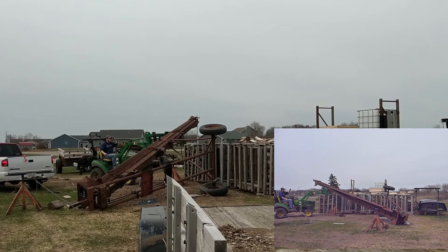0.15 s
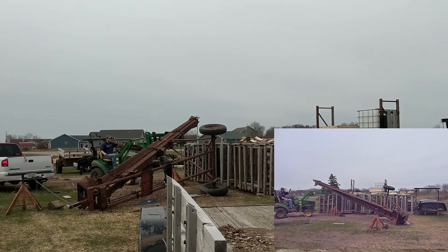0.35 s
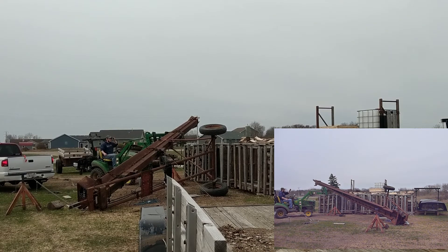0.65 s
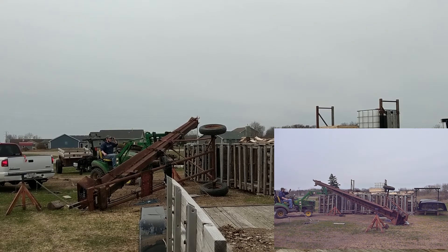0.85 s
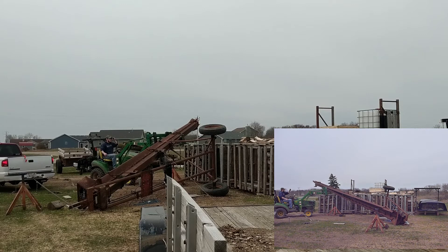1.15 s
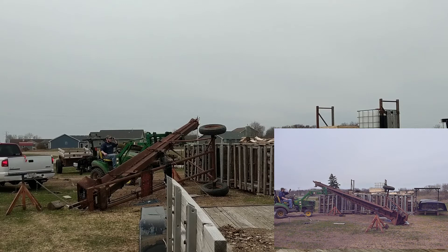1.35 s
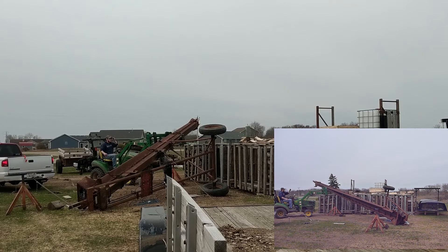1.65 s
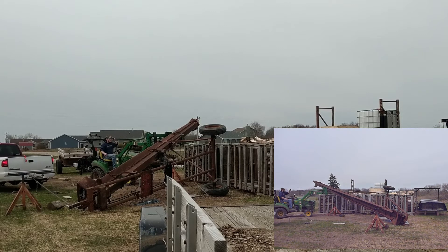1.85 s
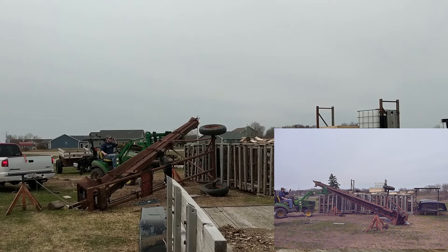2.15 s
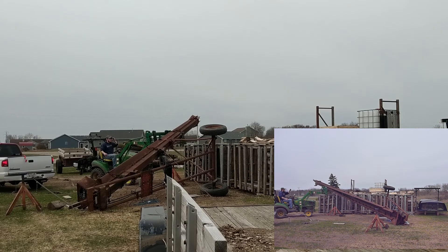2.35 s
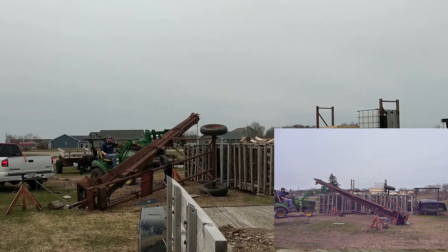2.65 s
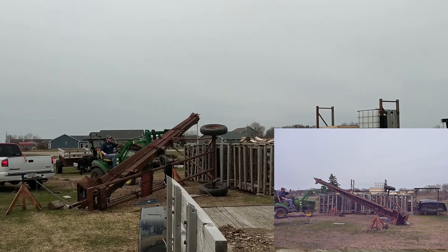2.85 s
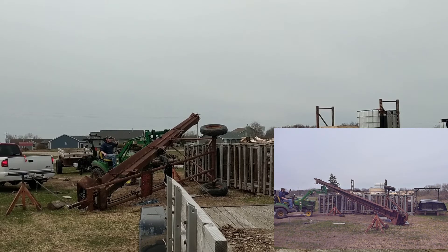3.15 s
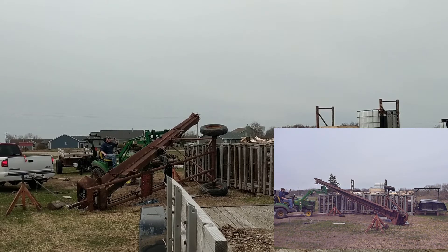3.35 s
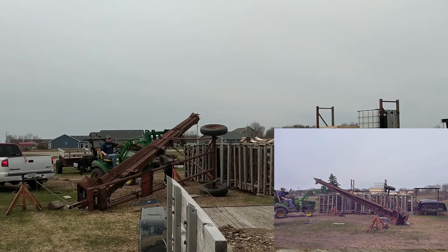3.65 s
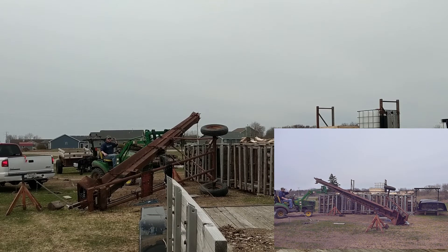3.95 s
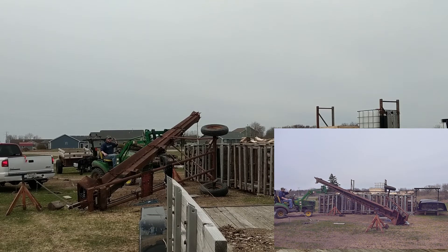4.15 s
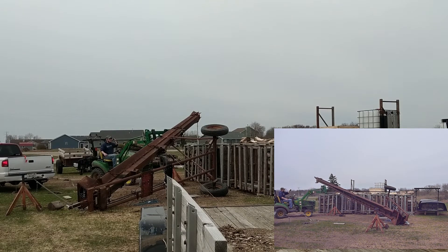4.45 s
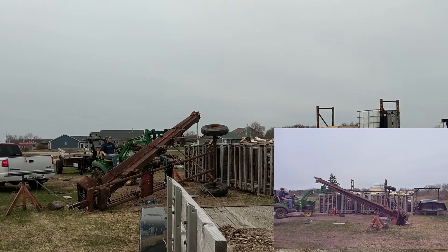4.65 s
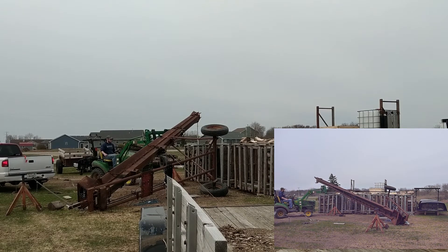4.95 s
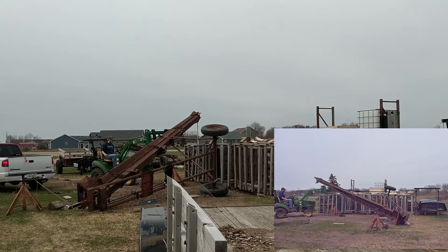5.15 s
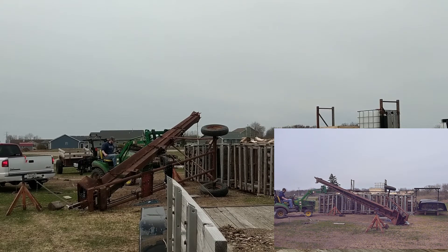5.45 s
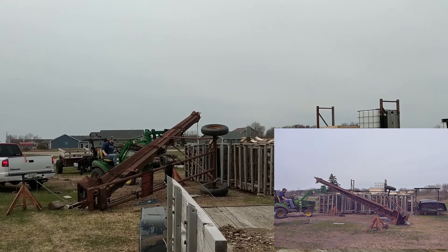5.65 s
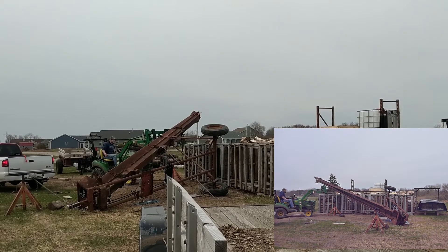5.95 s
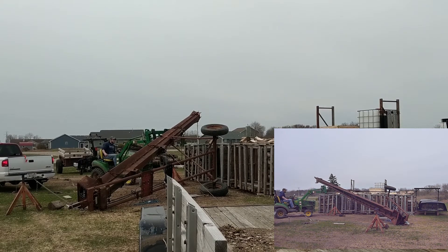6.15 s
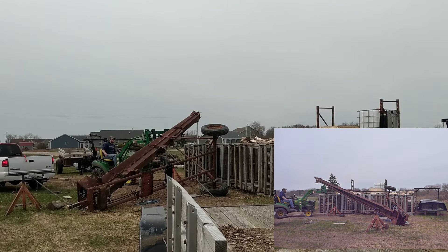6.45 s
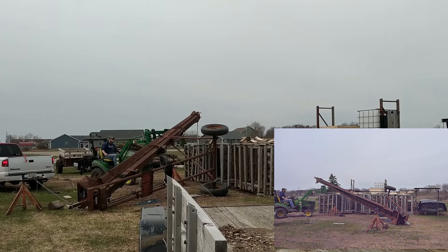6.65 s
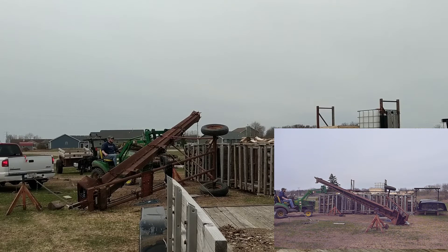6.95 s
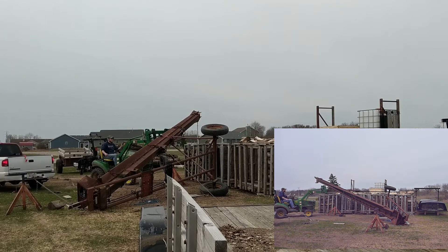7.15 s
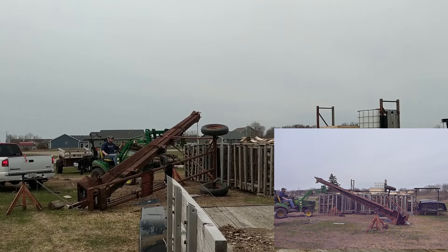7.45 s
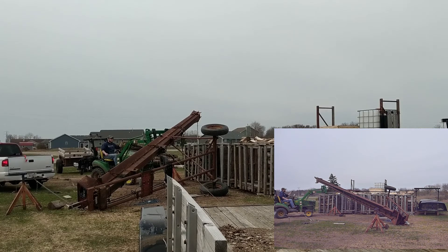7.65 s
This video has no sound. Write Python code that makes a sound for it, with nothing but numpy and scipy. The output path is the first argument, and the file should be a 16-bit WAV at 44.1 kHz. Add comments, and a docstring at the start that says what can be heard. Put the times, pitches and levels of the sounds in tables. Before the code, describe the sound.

Sharp metal creaks, clanks and a grinding groan come from a rusty farm elevator over a droning tractor engine and some wind.

```python
"""Tractor lifting a rusty farm elevator

A three-cylinder diesel runs some way off, sagging briefly as its hissing hydraulics take the weight.
The steel it lifts sticks and slips: a short clank, a sharp creak, a long grinding groan, then a
ratcheting creak. Each slip screeches at the joint and shakes the hollow frame.
Wind bumps on the microphone, and a bird whistles once, faintly."""
import sys
import numpy as np
from scipy import signal
from scipy.fft import rfft, irfft, next_fast_len
from scipy.io import wavfile
from scipy.ndimage import uniform_filter1d, map_coordinates

SR = 44100
rng = np.random.default_rng(int(sys.argv[2]) if len(sys.argv) > 2 else 0)


def master_out(mix):
    """Clip the mix to full scale and print it as 16-bit PCM to the path in sys.argv[1]."""
    frames = np.transpose(np.atleast_2d(mix))
    ceiling = np.clip(frames, -1, 1)
    pcm = np.round(ceiling * 32767).astype(np.int16)
    wavfile.write(sys.argv[1], SR, pcm)


N = 343980

# hard knocks as the load shifts, catches and lets go: t/s, level/dB
LOAD_KNOCKS = [(1.551, -29), (1.568, -35), (3.47, -26), (4.173, -27), (4.224, -24.5)]
# resonances of the joint: f/Hz, width/Hz, level/dB
JOINT_MODES = [(684, 58, -3), (1830, 120, -8), (2120, 99, 1), (2360, 110, -3.5), (3070, 29, -4),
               (4200, 80, -6), (4840, 43, -20), (5980, 240, -2), (6860, 250, -0.5)]


def amp(db):
    """Decibels to gain."""
    return 10 ** (np.asarray(db) / 20)


def unit(x):
    """Scale to rms 1."""
    return x / np.sqrt(np.mean(x ** 2) + 1e-20)


def curves(rows):
    """One envelope for each column after the time."""
    s, *cols = np.transpose(rows)
    return [np.interp(np.arange(N) / SR, s, c) for c in cols]


def during(rows):
    """A soft gate over the time that an envelope covers."""
    t = np.arange(N) / SR
    return uniform_filter1d(1. * (t > rows[0][0]) * (t < rows[-1][0]), size=400)


def wobble(rate):
    """Smooth random modulation, rate knots a second."""
    return map_coordinates(rng.standard_normal(int(N * rate / SR) + 4), [np.arange(N) * rate / SR])


def noise():
    """White noise of rms 1."""
    return rng.standard_normal(N)


def add(track, s, sound):
    """Mix a sound into a track from time s."""
    part = track[max(round(s * SR), 0):][:len(sound)]
    part += sound[:len(part)]


def filtered(x, response):
    """Apply a frequency response to x."""
    m = next_fast_len(N + SR // 2)
    return irfft(rfft(x, m) * response(np.fft.rfftfreq(m, 1 / SR)), m)[:N]


def coloured(x, points):
    """EQ through (f/Hz, level/dB) points; white noise keeps its level."""
    f, db = np.transpose(points)
    return filtered(x, lambda hz: unit(amp(np.interp(np.log(hz + 1), np.log(f + 1), db))))


def resonate(x, modes):
    """Ring (f/Hz, width/Hz, level/dB) modes; white noise keeps its level."""
    def response(f):
        h = sum(amp(db) * 1j * f * w / (c * c - f * f + 1j * f * w) for c, w, db in modes)
        h = h / (1 + (f / 7800) ** 8)  # the ringing rolls off above about 8 kHz
        return h / np.sqrt(np.mean(abs(h) ** 2))
    return filtered(x, response)


def ribbed(x, spacing_hz, depth_db):
    """The countless small resonances of a big steel body ripple the spectrum."""
    ripple = rng.standard_normal(SR // 4)
    return filtered(
        x, lambda hz: unit(amp(depth_db * map_coordinates(ripple, [hz / spacing_hz], mode="wrap"))))


def harmonics(phase, partials, flutter_db, rate):
    """Stack (multiple, level/dB) sines on a phase in radians, each fluttering in level."""
    return sum(amp(db + flutter_db * wobble(rate)) * np.sin(k * phase + rng.uniform(0, 2 * np.pi))
               for k, db in partials)


def whistle(rows, waver):
    """One thin, wavering tone along (t/s, f/Hz, level/dB) points."""
    hz, db = curves(rows)
    phase = 2 * np.pi * np.cumsum(hz * (1 + waver * wobble(220))) / SR
    return during(rows) * amp(db) * np.sin(phase)


def wind(eddy_cycles=0.28, lumpy_db=3.5, gust_db=-15, gust_s=0.024):
    """Lumpy low buffeting; single eddies, each in its own gust, push and pull the diaphragm."""
    # the breeze dies down and picks up again: t/s, level/dB
    breeze = [(0, -30), (1.15, -33.5), (1.85, -37.5), (2.3, -37.5), (4.2, -33.5), (5.15, -53), (5.8, -36.5),
              (6.5, -46), (7.8, -37.5)]
    # the strongest eddies: t/s, level/dB, f/Hz
    bumps = [(0.139, -15, 109), (0.206, -17.5, 96), (.5, -21, 75), (0.892, -12.5, 178), (1.085, -14.5, 170),
             (1.151, -12.5, 130), (1.536, -18.5, 105), (1.619, -12.5, 239), (2.775, -20, 98),
             (2.918, -14.5, 160), (3.008, -12.5, 172), (3.19, -19.5, 140), (3.594, -10, 111),
             (3.942, -16, 80), (4.087, -12, 75.15), (5.91, -20, 70), (5.965, -18.5, 115), (6.115, -20, 126),
             (6.3, -20, 75), (6.641, -19, 70.4), (7.09, -25, 80)]
    # spectrum of the buffeting: f/Hz, level/dB
    buffet_eq = [(20, -42), (45, -5), (65, 1), (140, -3.5), (250, -12.5), (500, -30), (1500, -66),
                 (4000, -120)]
    breeze_db, = curves(breeze)
    strength, eddies = amp(breeze_db - 0.5 + lumpy_db * wobble(18)), np.zeros(N)
    t = np.arange(-SR // 10, SR // 10) / SR
    for s, db, hz in bumps:
        add(strength, s + t[0], amp(db + gust_db) * np.exp(-(t / gust_s) ** 2))
        add(eddies, s + t[0], -amp(db) * np.sin(2 * np.pi * hz * t) / np.cosh(t * hz / eddy_cycles))
    return strength * coloured(noise(), buffet_eq) + eddies


def bird():
    """A distant bird gives one rising whistle."""
    # the call: t/s, f/Hz, level/dB
    call = [(6.92, 3740, -80), (6.96, 3860, -52), (7.05, 3900, -53), (7.13, 3900, -62)]
    return whistle(call, waver=.001)


def tractor():
    """Three firings a cycle make the exhaust note and knock the block, over valve and gear clatter."""
    # engine speed, sagging under the load: t/s, firing rate/Hz
    speed = [(0, 54.4), (1.7, 54.4), (2.1, 53), (2.7, 52.9), (3.0, 54.9), (3.3, 54.4), (7.8, 54.3)]
    # exhaust note: multiple of the four-stroke cycle, level/dB
    exhaust_partials = [(1, -38), (2, -37), (3, -1.5), (4, -7), (5, -7), (6, 0.5), (7, -14), (8, -18),
                        (9, -25), (10, -14.5), (11, -14.5), (12, -1.5), (13, -4.5), (14, -25), (15, 0.5),
                        (16, -22), (17, -11), (18, -16), (19, -17.5), (20, -38), (21, -18), (22, -34),
                        (23, -35), (24, -7), (25, -14.5), (26, -23), (27, -22.5), (28, -23), (29, -29),
                        (30, -43), (31, -22), (32, -21.5)]
    # resonances of the engine block: f/Hz, width/Hz, level/dB
    block_modes = [(856, 39, -3), (1720, 43, -2), (2048, 30, 0.5), (2254, 22, -4), (2592, 68, -3.5),
                   (2834, 126, -0.5), (5120, 130, -5)]
    # spectrum of valves and gears: f/Hz, level/dB
    clatter_eq = [(280, -41), (480, -4.5), (563, -3.5), (651, -3), (846, -2.5), (1150, -11), (1700, -10),
                  (2380, -12.5), (2870, -11), (3370, -15.5), (4500, -18.5), (5940, -10), (6870, -15.5),
                  (8300, -35.5), (11000, -33), (15500, -38)]
    # spectrum of the low rumble: f/Hz, level/dB
    rumble_eq = [(15, -46), (25, -65), (43, 11.5), (114, -3.5), (161, -4), (274, -4), (403, -16),
                 (425, -13), (600, -21), (780, -68), (1320, -120)]
    firing_hz, = curves(speed)
    sag_hz = firing_hz[0] - firing_hz
    exhaust_db, clatter_db = -32.5 - 0.5 * sag_hz, -47 + 0.9 * sag_hz
    cycle = 2 * np.pi * np.cumsum(firing_hz * (1 + .0015 * wobble(12))) / SR / 3
    exhaust = harmonics(cycle, exhaust_partials, flutter_db=0.95, rate=7)
    blows = unit(np.exp(.45 * np.cos(3 * cycle)) * amp(1.8 * wobble(40)))  # no two equally hard
    knock = amp(-6 + 1.9 * wobble(5)) * resonate(noise() * blows, block_modes)
    valves = unit(np.exp(.1 * np.cos(3 * cycle) + .1 * np.cos(cycle)))
    flutter = amp(0.5 + 0.54 * wobble(7.8))
    clatter = flutter * ribbed(coloured(noise() * valves, clatter_eq), spacing_hz=43.86, depth_db=2)
    rumble = amp(-40.5) * coloured(noise(), rumble_eq)
    return amp(exhaust_db) * unit(exhaust) + amp(clatter_db) * (knock + clatter) + rumble


def hydraulics(hz=5950, width_hz=160):
    """Oil sings through the lift valve as a narrow hiss while the engine labours."""
    # swell of the hiss: t/s, level/dB
    hiss = [(1.7, -78), (1.95, -60), (2.2, -47.5), (2.6, -51), (2.9, -78)]
    db, = curves(hiss)
    return during(hiss) * amp(db) * resonate(noise(), [(hz, width_hz, 0)])


def stick_slip(pace, peak_s, peak_db, swell_db_per_s, fade_db_per_s, scatter_db=0.6):
    """Slips as (t/s, level/dB): strain builds and lets go, under a force that swells and fades."""
    s, rate = np.transpose(pace)
    t = np.arange(s[0], s[-1], 1 / SR)
    strain = np.cumsum(np.interp(t, s, rate)) / SR
    times = np.interp(np.arange(np.ceil(strain[-1])), strain, t)
    db = peak_db - np.maximum(swell_db_per_s * (peak_s - times), fade_db_per_s * (times - peak_s))
    db[0] -= 0.5  # the first slip only breaks the rust loose
    return list(zip(times, db + scatter_db * rng.standard_normal(len(times))))


def slips(rows, rise_s, decay_s, frame_t60, dynamics, alike=0.78):
    """Two noise tracks: each slip's brief screech at the contact, and the steel frame's shudder."""
    t = np.arange(-SR // 100, SR // 4) / SR
    swell = np.exp(-(np.minimum(t, 0) / rise_s) ** 2)
    screech = swell * np.exp(-np.maximum(t, 0) / decay_s)
    shudder = swell * amp(-60 * np.maximum(t, 0) / frame_t60)
    signature = rng.standard_normal((2, len(t)))  # one joint answers much alike at every slip
    contact, body = np.zeros(N), np.zeros(N)
    for s, db in rows:
        bite, answer = rng.standard_normal((2, len(t))) + [[.35], [alike]] * signature
        start = s + t[0] + rng.uniform(-.0005, .0005)
        add(contact, start, amp(db) * screech * unit(bite))
        add(body, start, amp(dynamics * (db + 22)) * shudder * unit(answer))
    return contact, body


def squeals(rows, tones, half_length_s, detune):
    """While it slides, the joint vibrates roughly for a few milliseconds at its own pitches."""
    t = np.arange(-SR // 100, SR // 100) / SR
    swell = np.exp(-(t / half_length_s) ** 2)
    hz, level = np.transpose(tones)[:, :, None]
    track = np.zeros(N)
    for s, db in rows:
        pitch = hz * (1 + detune * rng.standard_normal(hz.shape))
        stumble = np.cumsum(.09 * rng.standard_normal((len(hz), len(t))), axis=1)  # rust jogs the phase
        tone = np.sum(amp(level) * np.sin(2 * np.pi * pitch * t + stumble), axis=0)
        add(track, s + t[0], amp(db) * swell * unit(tone))
    return filtered(track, lambda f: 1 / (1 + (f / 8200) ** 16))


def small_snags(count=8, from_s=3.8, to_s=4.2):
    """Rust flakes catch at uneven moments during the drag: (t/s, level/dB)."""
    share = (np.arange(count) + rng.random(count)) / count
    return list(zip(from_s + (to_s - from_s) * share, -26 + 3 * rng.standard_normal(count)))


def cracks(rows, gain_db=-14, decay_s=0.00054):
    """A tiny dry crack of breaking rust on each (t/s, level/dB) blow."""
    t, track = np.arange(SR // 100) / SR, np.zeros(N)
    for s, db in rows:
        add(track, s, amp(db + gain_db) * np.exp(-t / decay_s) * rng.standard_normal(len(t)))
    return track


def squeak():
    """The joint's thin dying squeak on the tail of the creak."""
    # its glide: t/s, f/Hz, level/dB
    glide = [(2.76, 7850, -58), (2.775, 7700, -42), (2.81, 7600, -51), (2.87, 7780, -64)]
    return whistle(glide, waver=.012)


def knocks():
    """The steel clanks as the load shifts; each knock leaves the joint ringing briefly."""
    # spectrum of the impact: f/Hz, level/dB
    bite_eq = [(300, -22), (750, 9.5), (1300, -9), (2100, -3.5), (3400, -0.5), (4400, 1.5), (5300, -5.5),
               (6800, 4), (8500, -21), (15000, -19)]
    contact, body = slips(LOAD_KNOCKS, rise_s=.003, decay_s=.0081, frame_t60=.068, dynamics=.88)
    bite = coloured(amp(-3) * contact + amp(-34) * body, bite_eq)
    return bite + amp(-28.5) * resonate(body, JOINT_MODES)


def grind(grit=0.5, jitter=.04, groan_full_hz=367, loss_db_per_hz=0.1):
    """Rusty steel drags over steel: fast uneven slips rasp, and the frame groans at their pitch."""
    # the drag: t/s, slip rate/Hz, level/dB
    drag = [(3.47, 280, -36), (3.54, 350, -34), (3.65, 430, -31.5), (3.95, 393, -30), (4.13, 382, -32.5),
            (4.23, 340, -31), (4.31, 320, -46), (4.4, 167, -66)]
    # spectrum of the scraped frame: f/Hz, level/dB
    frame_eq = [(180, -46), (300, -8), (397, -4.5), (543, -6.5), (821, -9.5), (907, -10.5), (1940, -19.5),
                (3340, -17), (4800, -22.5), (6050, -12.5), (6900, -17.5), (8560, -46), (10800, -37.5),
                (12500, -48), (15500, -54)]
    # resonances of the frame: f/Hz, width/Hz, level/dB
    frame_modes = [(396, 60, 0), (630, 25, -3), (829, 36, 0), (1220, 90, -12), (1400, 50, -12),
                   (1570, 55, -8), (2490, 70, -15), (3340, 70, -13), (4430, 90, -15), (5190, 90, -11)]
    # pitched core of the groan: multiple of the slip rate, level/dB
    core_partials = [(1, -2.5), (2, -7), (3, -15), (4, -14)]
    slip_hz, level_db = curves(drag)
    level_db = level_db + 0.36 * wobble(32)
    # the groan thins out when the slips fall below the frame's lowest resonance
    loss_db = loss_db_per_hz * np.maximum(groan_full_hz - slip_hz, 0)
    groan_db = level_db - 1.5 - loss_db + 1.5 * wobble(45)
    phase = np.cumsum(slip_hz * np.exp(jitter * wobble(300))) / SR
    jerks = unit(np.diff(np.floor(phase), prepend=0) * amp(2.5 * wobble(300)))
    rasp = unit(noise() * np.exp(-1.5 * (phase % 1)) * amp(1.2 * wobble(60)))
    scrape = amp(level_db + 2) * coloured(unit(0.15 * jerks + grit * rasp), frame_eq)
    core = harmonics(2 * np.pi * phase, core_partials, flutter_db=2.5, rate=30)
    groan = amp(groan_db) * (resonate(unit(.45 * jerks + rasp), frame_modes) + core)
    return during(drag) * (ribbed(scrape, spacing_hz=35, depth_db=2.7) + groan)


def ratchet():
    """Even slips speed up and slow down again, and the elevator's hollow trough rings along."""
    # pace of the stroke: t/s, slip rate/Hz
    pace = [(7.217, 14.9), (7.26, 45.9), (7.295, 51.2), (7.37, 103.3), (7.47, 105.4), (7.565, 99.7),
            (7.615, 55.6), (7.73, 41.2)]
    # squeal of the joint: f/Hz, level/dB
    tones = [(5700, -7), (6120, 5), (6650, -16), (7080, -4)]
    # bright bite of a slip: f/Hz, level/dB
    bite_eq = [(500, 5), (2200, -13), (5100, -14), (5650, 19), (6100, 1), (6450, -11), (7050, 12),
               (8200, -28), (11000, -13), (15500, -34)]
    # the hollow frame's answer: f/Hz, level/dB
    frame_eq = [(130, -37), (240, -0.5), (330, -1), (560, -17.5), (700, -5.5), (1050, -10), (1400, -19.5),
                (1600, -16.5), (2200, -14.5), (2500, -17.5), (3300, -17.5), (5000, -20), (6800, -11.5),
                (8200, -32.5), (15000, -45.5)]
    # resonances of the trough: f/Hz, width/Hz, level/dB
    trough_modes = [(249, 30, -5), (694, 17, 5.5), (755, 24, -2.5), (1373, 40, -5.5), (2140, 45, -12),
                    (5870, 73, -12)]
    train = stick_slip(pace, peak_s=7.45, peak_db=-21.6, swell_db_per_s=8, fade_db_per_s=4)
    contact, _ = slips(train, rise_s=.0025, decay_s=.0038, frame_t60=.2, dynamics=.7)
    # the trough's shudder builds up later than the force
    shudder = stick_slip(pace, peak_s=7.62, peak_db=-20, swell_db_per_s=7, fade_db_per_s=3)
    _, body = slips(shudder, rise_s=.0025, decay_s=.0038, frame_t60=.22, dynamics=.8, alike=.4)
    squeal = amp(-3) * squeals(train, tones, half_length_s=.0028, detune=.008)
    bite = amp(-9) * coloured(contact, bite_eq)
    frame = amp(-30.5) * ribbed(coloured(body, frame_eq), spacing_hz=39.86, depth_db=3.5)
    return squeal + bite + frame + amp(-35.6) * resonate(body, trough_modes)


def creak():
    """The joint lets go in trains of sharp slips, and snags again and again as it drags."""
    # pace of the main stroke: t/s, slip rate/Hz
    pace = [(2.239, 19.9), (2.27, 79.9), (2.36, 52.3), (2.435, 45.2), (2.47, 56.9), (2.52, 47.1),
            (2.61, 47.7), (2.745, 34.6)]
    # the jerk that ends the drag: t/s, slip rate/Hz
    last_jerk = [(4.257, 110), (4.3, 75), (4.35, 40)]
    # the hardest single snags: t/s, level/dB
    hard_snags = [(2.613, -12), (2.734, -21), (2.791, -27), (2.867, -29.5), (3.633, -24), (3.748, -19)]
    # squeal of the joint: f/Hz, level/dB
    tones = [(4450, -10), (6040, -2), (6720, -2), (7200, -9)]
    # bright bite of a slip: f/Hz, level/dB
    bite_eq = [(500, -62), (2000, -35), (3700, -26), (4400, -12), (5400, -18), (6050, 7.5), (6400, -5),
               (6750, 7.5), (7300, -7), (8200, -39), (10600, -13), (12000, -34), (15500, -39)]
    # the hollow frame's answer: f/Hz, level/dB
    frame_eq = [(120, -44), (220, 5.5), (500, -6.5), (750, -5), (1050, -7.5), (1250, -8), (1550, -18),
                (2100, -16), (2450, -30), (2650, -10), (3050, -10), (3800, -12), (6500, -4), (8200, -25),
                (15000, -31.5)]
    train = stick_slip(pace, peak_s=2.61, peak_db=-15.9, swell_db_per_s=9, fade_db_per_s=72)
    train += stick_slip(last_jerk, peak_s=4.297, peak_db=-20, swell_db_per_s=80, fade_db_per_s=75)
    contact, body = slips(train, rise_s=.0028, decay_s=.0048, frame_t60=.2, dynamics=.65)
    snags = hard_snags + small_snags()
    snag, snag_body = slips(snags, rise_s=.0033, decay_s=.0052, frame_t60=.22, dynamics=.28)
    squeal = amp(-3.5) * squeals(train, tones, half_length_s=.0033, detune=.012)
    # the bite lingers a little in the frame
    bite = coloured(amp(-9) * contact + amp(-5) * snag + amp(-39) * body, bite_eq)
    frame = coloured(amp(-30) * body + amp(-31) * snag_body, frame_eq)
    ring = resonate(amp(-37) * body + amp(-38) * snag_body, JOINT_MODES)
    steel = ribbed(bite + frame, spacing_hz=70, depth_db=2.5)
    return squeal + steel + ring + cracks(hard_snags + LOAD_KNOCKS)


def scene():
    """The open yard, mixed in mono."""
    steel = knocks() + creak() + squeak() + grind() + ratchet()
    return (tractor() + hydraulics() + steel + wind() + bird())[None]


def record(dry, low_hz=37, top_hz=15720):
    """A low cut trims the deepest bass and a brick wall takes off the very top."""
    low_cut = signal.butter(3, low_hz, "highpass", fs=SR, output="sos")
    return filtered(signal.sosfilt(low_cut, dry[0]), lambda hz: hz < top_hz)[None]


dry = scene()
out = record(dry)
master_out(out)
```